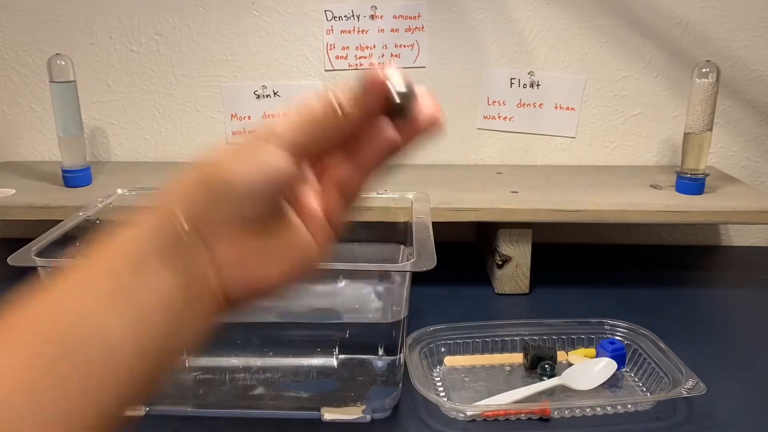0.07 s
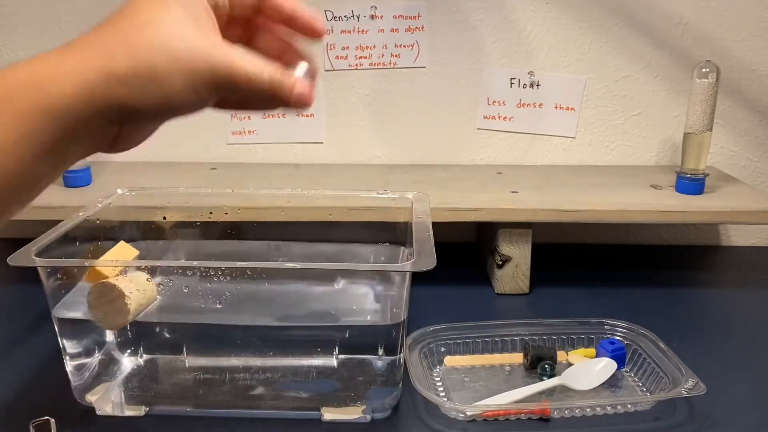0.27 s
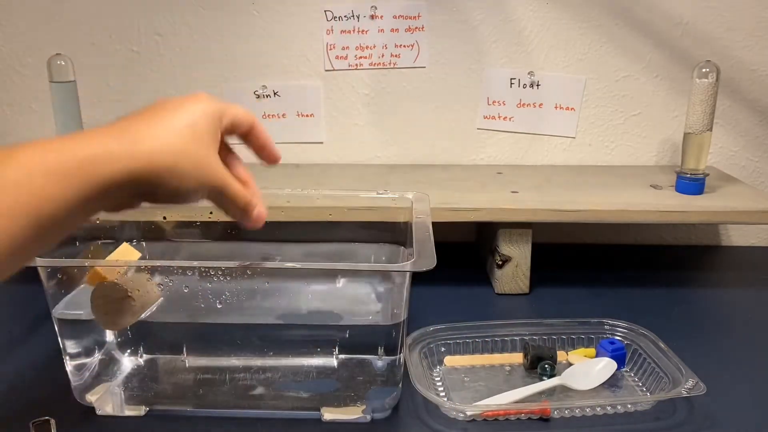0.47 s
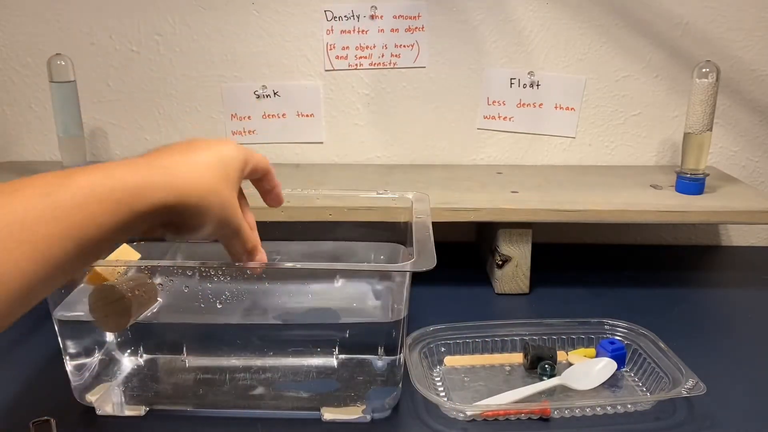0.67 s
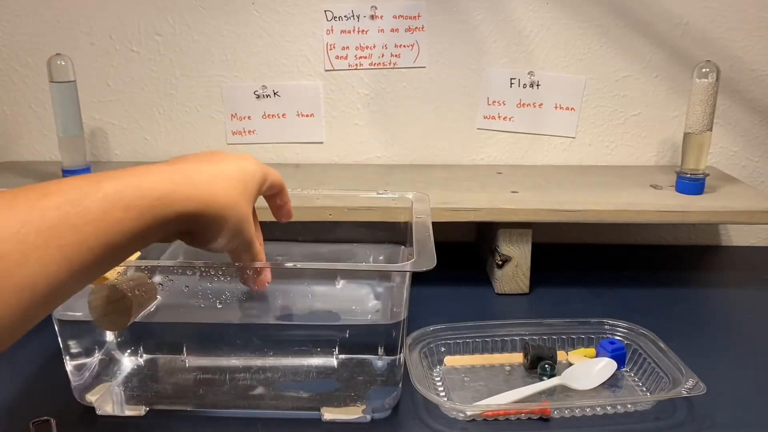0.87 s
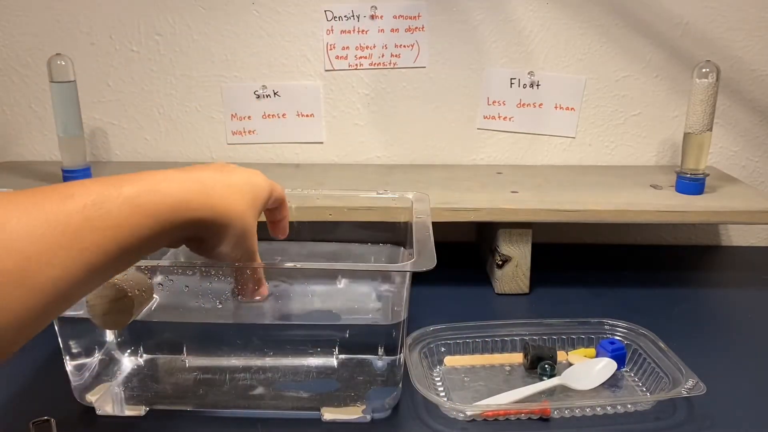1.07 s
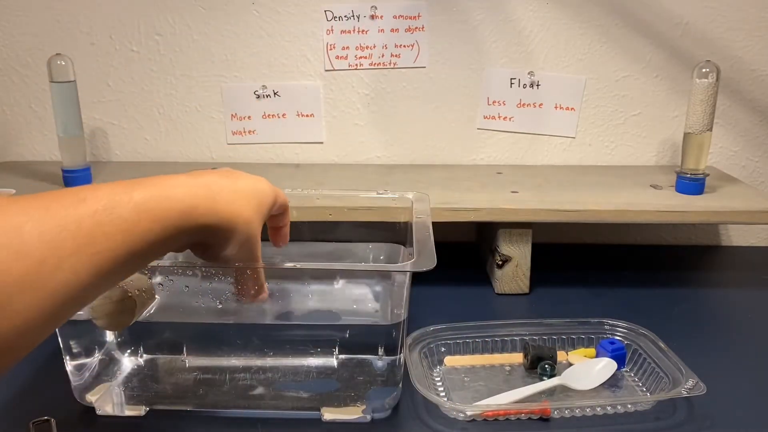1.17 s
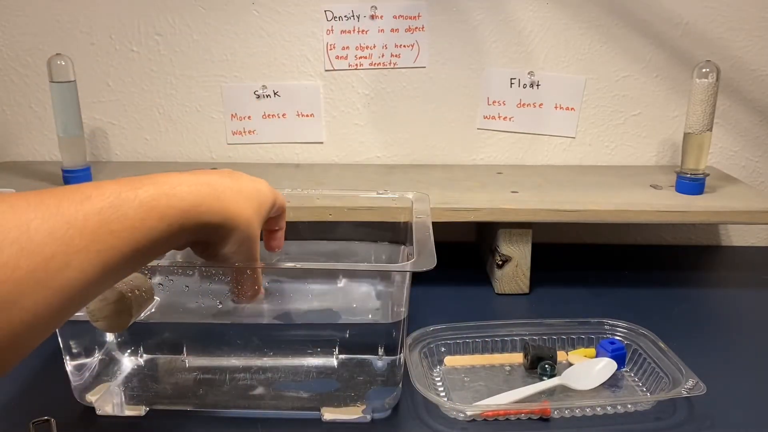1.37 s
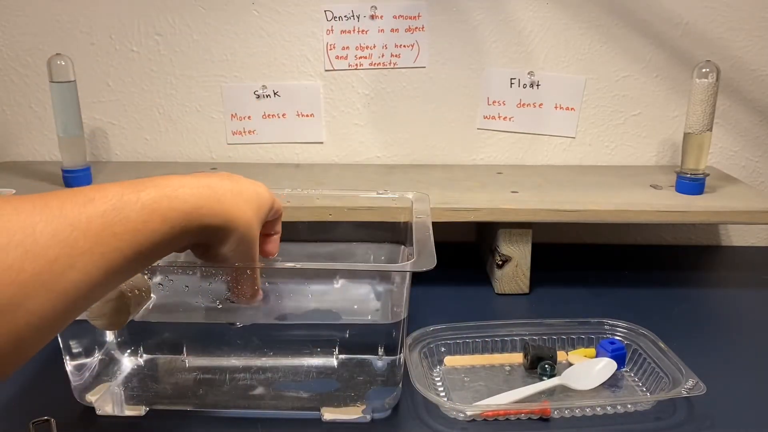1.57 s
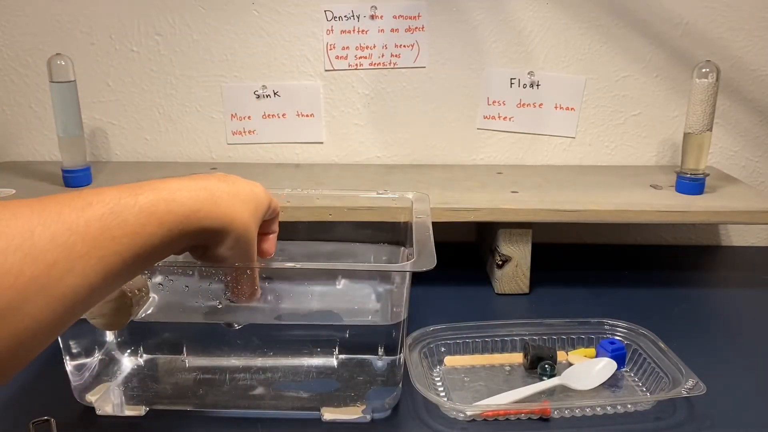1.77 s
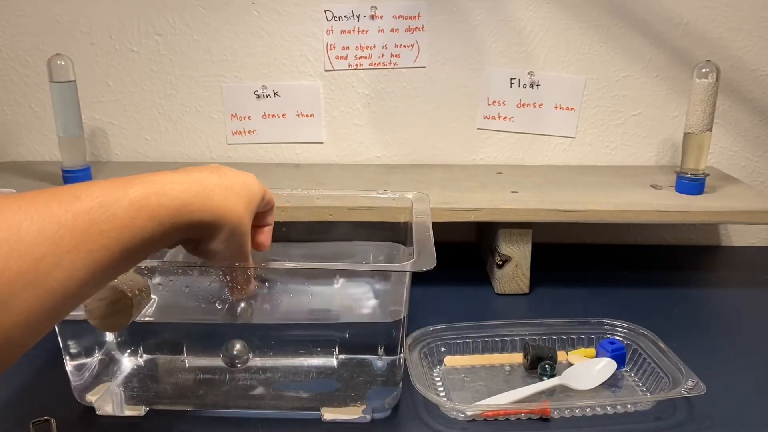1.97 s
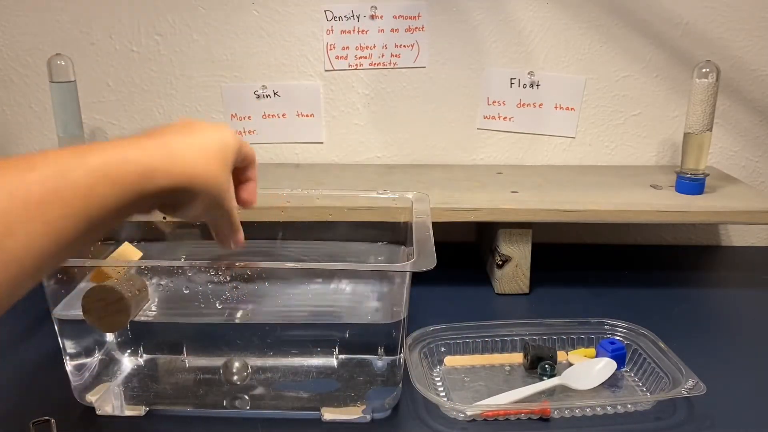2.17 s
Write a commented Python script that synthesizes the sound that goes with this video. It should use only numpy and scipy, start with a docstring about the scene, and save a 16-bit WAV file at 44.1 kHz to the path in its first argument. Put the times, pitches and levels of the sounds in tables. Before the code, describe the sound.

Hard hollow knocks of a metal ball bouncing in a water-filled plastic tub, after quiet room hum.

```python
"""On a table in a small room, a steel ball let go under water bounces four times on the floor of a plastic tub.
Each bounce is sooner and weaker, and the sound ends just after the fourth lands. Each blow is a dispersed
bending wave (treble first, bass later), damped modes of tub and table, a thud, and decaying bands of noise.
Shaped ventilation noise and a wavering sine as appliance hum run throughout; four tiny noise-burst ticks
come before the ball. Two close microphone ports hear it all."""
import sys
import numpy as np
from scipy import signal
from scipy.fft import rfft, irfft
from scipy.io import wavfile
from scipy.ndimage import uniform_filter1d

SR = 44100
rng = np.random.default_rng(int(sys.argv[2]) if len(sys.argv) > 2 else 0)


def generate_wav(sig):
    """Save sig (samples, or channels by samples) to the path in sys.argv[1] as 16-bit PCM at SR."""
    pcm = np.round(np.clip(np.atleast_2d(sig).T, -1, 1) * 32767).astype(np.int16)
    wavfile.write(sys.argv[1], SR, pcm)


N = 97416


def undb(db):
    """Decibel law: level to amplitude gain."""
    return 10 ** (np.asarray(db) / 20)


def unit(x):
    """Root-mean-square normalization to 1."""
    return x / np.sqrt(np.mean(x ** 2))


def read(table, hz):
    """Linear interpolation of a table's columns over log frequency."""
    rows = np.array(table).T
    log_hz = np.log(np.maximum(hz, 1))
    return [np.interp(log_hz, np.log(rows[0]), column) for column in rows[1:]]


def sides(pan_db):
    """Level difference, left minus right, split evenly into a column of two gains."""
    return undb(np.array([[pan_db], [-pan_db]]) / 2)


def pair(hz, width, like, size):
    """Partial coherence: two ports share a mid noise and oppose a side noise; width is in log frequency."""
    f = np.fft.rfftfreq(size, 1 / SR)
    shape = np.exp(-.5 * (np.log(np.maximum(f, 1) / hz) / width) ** 2)
    mid, side = (unit(irfft(rfft(rng.standard_normal(size)) * shape, size)) for _ in range(2))
    like = np.clip(like, -1, 1)
    opposed = side * np.array([[1], [-1]])
    return (np.sqrt(1 + like) * mid + np.sqrt(1 - like) * opposed) / np.sqrt(2)


def walk(rate):
    """Slow random modulation of rms 1: random steps, rate per second, smoothed twice."""
    k = int(SR / rate)
    steps = np.repeat(rng.standard_normal(N // k + 1), k)
    smooth = uniform_filter1d(uniform_filter1d(steps, k), k)
    return unit(smooth[:N])


def ring(t, t60, swell):
    """Exponential decay, 60 dB in t60, after a smooth build-up."""
    return (1 - np.exp(-(t / swell) ** 2)) * np.exp(-np.log(1000) * t / t60)


# spectrum of the room air: f/Hz, relative density level/dB per Hz
AIR_SPECTRUM = [(15, -46), (25, -12), (124, -6), (167, -14), (349, -14), (470, -18.5), (600, -16),
                (1060, -29), (7510, -59), (8830, -57), (11300, -70), (16500, -105)]
# coherence of the air noise at the two ports: f/Hz, correlation (-1 to 1)
AIR_COHERENCE = [(60, 1), (130, 0.73), (290, 0.49), (640, 0.035), (1400, -0.4), (3100, 0.37), (15000, 0.25)]
AIR_DB, AIR_PAN_DB = -57.5, 3.5  # rms level before panning; left minus right
AIR_SWELL_DB, AIR_FLICKER_DB = .5, 1  # rms drift of all bands together, and of each alone
DUCT_HZ, DUCT_WIDTH_HZ, DUCT_DB = 568, 69, -67


def air():
    """Broadband flow noise: third-octave bands swell together and flicker alone, beside one duct resonance."""
    bands, swell = 0, walk(6.15)
    for hz in 25 * 2 ** np.arange(0, 9.4, 1 / 3):
        # a band's power grows with its bandwidth, hence with its frequency
        db = read(AIR_SPECTRUM, hz)[0] + 10 * np.log10(hz)
        db = db + AIR_SWELL_DB * swell + AIR_FLICKER_DB * walk(6.52)
        bands = bands + undb(db) * pair(hz, .12, read(AIR_COHERENCE, hz)[0], N)
    duct = pair(DUCT_HZ, DUCT_WIDTH_HZ / DUCT_HZ / 2, 0., N)
    return (undb(AIR_DB) * unit(bands) + undb(DUCT_DB) * duct) * sides(AIR_PAN_DB)


HUM_HZ, HUM_DB = 118.1, -59.5  # center values
HUM_DRIFT, HUM_WAVER_DB = 0.011, 1.8  # rms drift of pitch (as a fraction) and of level


def hum():
    """Frequency and amplitude modulation: a low sine wavers slowly in pitch and level."""
    hz = HUM_HZ * (1 + HUM_DRIFT * walk(16.3))
    phase = 2 * np.pi * np.cumsum(hz) / SR
    return np.sqrt(2) * undb(HUM_DB + HUM_WAVER_DB * walk(9.4)) * np.sin(phase)


# tiny ticks: t/s, noise level/dB before the envelope, f/Hz, width in log frequency, t60/s,
# left minus right level/dB
TICK_BURSTS = [(.467, -76, 12500, 0.25, .06, 0), (.583, -78, 4230, .03, .03, 10),
               (0.935, -73, 7500, 0.31, 0.034, -2), (.952, -80, 6330, .15, .08, 1)]


def ticks():
    """Band-limited impulsive noise: each tick is a short burst under a decaying envelope."""
    size = SR // 20
    t, out = np.arange(size) / SR, np.zeros((2, N))
    for s, db, hz, width, t60, pan_db in TICK_BURSTS:
        start = int(s * SR)
        burst = ring(t, t60, .0005) * pair(hz, width, 0.44, size)
        out[:, start:start + size] += undb(db) * burst * sides(pan_db)
    return out


# first wave through the tub floor: f/Hz, relative level/dB, left minus right level/dB
FLOOR_WAVE = [(202, -17, 0), (454, 4, 3), (990, 5.5, -12), (1200, 24, -26), (1470, 19, -4), (1800, 7, -13),
              (2750, 16, 6), (4130, 6, 2), (4600, -6.5, 17), (5460, 11.5, 0), (6960, -1, -6),
              (10200, -1.5, 2.5), (12200, -6, 8), (16000, -12, -14)]
# returns from the tub walls: delay t/s, level/dB re first wave, left minus right level/dB
WALL_ECHOES = [(.0004, -11, -3), (.00115, -6, 3), (.0019, -14, -2), (.003, -16, -3)]
WAVE_DB, WAVE_SPLIT_HZ = 15.5, 650
TRAVEL_S, TRAVEL_POWER = .0015, 1.3  # delay at 1 kHz, and its growth towards the bass
PORT_LAG_S = .00028  # the left port hears the tub later


def wave(size, crack_db, body_db):
    """Dispersion of bending waves: a click spreads out, each frequency arriving later the lower it is."""
    f = np.fft.rfftfreq(size, 1 / SR)
    delay = TRAVEL_S * (np.maximum(f, 100) / 1000) ** -TRAVEL_POWER
    db, pan_db = read(FLOOR_WAVE, f)
    # body and crack levels add below the split; the crack level counts twice above it
    low = 1 / (1 + (f / WAVE_SPLIT_HZ) ** 4)
    gain = undb(db + low * body_db + (2 - low) * crack_db + WAVE_DB)
    gain = gain * (f / 200) ** 2 / (1 + (f / 200) ** 2)  # bass roll-off
    # phase is the integral of group delay over frequency
    phase = 2 * np.pi * (np.cumsum(delay) * f[1] + np.array([[PORT_LAG_S], [0]]) * f)
    walls = 1
    for s, wall_db, wall_pan_db in WALL_ECHOES:
        walls = walls + undb(wall_db) * sides(wall_pan_db) * np.exp(-2j * np.pi * f * s)
    ports = undb(np.array([pan_db, -pan_db]) / 2)
    return -irfft(gain * ports * walls * np.exp(-1j * phase), size)


MODE_LATE_S, MODE_LATE_POWER = .00064, .4  # onset delay at 1 kHz, and its growth towards the bass


def mode(t, hz, t60, swell):
    """Damped normal mode: a decaying sine, starting later the lower its frequency."""
    since = np.maximum(t - MODE_LATE_S * (hz / 1000) ** -MODE_LATE_POWER, 0)
    return ring(since, t60, swell) * np.sin(2 * np.pi * hz * since)


# modes of tub and table: f/Hz, left relative level/dB, right relative level/dB, t60/s, swell t/s,
# left polarity, right polarity
TUB_MODES = [(145.4, -13.8, -13.5, 0.448, 0.0023, -1, -1), (195.4, -12.1, -9.2, 0.087, 0.0134, 1, 1),
             (263.8, -1.3, -1.7, 0.136, 0.0198, -1, -1), (270.7, -7.3, -23.6, 0.204, 0.02, -1, -1),
             (295.3, -26.1, -32.5, 0.665, 0.02, 1, 1), (323.8, -10.4, -40.9, 0.258, 0.0183, -1, -1),
             (391.5, -20.6, -42.4, 0.325, 0.0055, -1, -1), (415.3, 0.5, -36.0, 0.156, 0.0012, 1, 1),
             (415.3, -5.4, -13.8, 0.312, 0.001, -1, -1), (445.2, -19.2, -20.8, 0.361, 0.001, -1, -1),
             (475.1, 0.7, -5.3, 0.103, 0.001, -1, -1), (503.8, -10.0, -27.3, 0.352, 0.02, -1, 1),
             (518.9, -13.7, -18.9, 0.267, 0.02, 1, 1), (534.8, -4.9, -14.8, 0.201, 0.0142, 1, 1),
             (561.8, -7.7, -29.7, 0.174, 0.017, 1, -1), (588.4, -7.9, -34.5, 0.228, 0.02, 1, -1),
             (597.4, 2.3, -5.2, 0.078, 0.0013, -1, -1), (618.5, -9.4, -27.6, 0.279, 0.0148, -1, -1),
             (652.3, -18.6, -6.8, 0.174, 0.0197, 1, -1), (692.7, -13.0, -21.2, 0.23, 0.0012, 1, 1),
             (711.8, -22.3, -17.6, 0.421, 0.001, -1, 1), (735.5, -29.8, -10.5, 0.145, 0.0026, 1, -1),
             (774.1, -34.5, -57.4, 0.7, 0.02, -1, 1), (786.5, -6.2, -2.7, 0.071, 0.0015, -1, -1),
             (825.6, -26.6, -29.8, 0.45, 0.0112, -1, 1), (849.5, -14.0, -12.2, 0.117, 0.001, -1, 1),
             (917.1, -23.3, -22.3, 0.283, 0.0034, -1, 1), (953.6, -15.2, -24.7, 0.148, 0.001, 1, -1),
             (1011.6, -36.8, -17.1, 0.202, 0.001, 1, -1), (1031.7, -14.1, -21.2, 0.112, 0.004, -1, 1),
             (1165, -26, -26, 0.19, 0.001, 1, 1), (1515, -23, -23, 0.12, 0.001, 1, 1),
             (1850, -27, -27, 0.08, 0.001, 1, 1), (2850, -32, -32, 0.1, 0.001, 1, 1),
             (3200, -30, -30, 0.1, 0.001, 1, 1)]
MODES_DB, MODE_SCATTER_DB = 4, 1  # added to all modes; random spread of each at each bounce


def tub_modes(heard, body_db):
    """Modal superposition: tub and table ring as a sum of damped modes, excited a little differently each time."""
    out = 0
    scatter = MODE_SCATTER_DB * rng.standard_normal(len(TUB_MODES))
    for (hz, left_db, right_db, t60, swell, left, right), own_db in zip(TUB_MODES, scatter):
        ports = undb([[left_db], [right_db]]) * [[left], [right]]
        out = out + undb(own_db + body_db + MODES_DB) * ports * mode(heard, hz, t60, swell)
    return out


# thud of the table: f/Hz, level/dB re the bounce's thud, t60/s, swell t/s, polarity
TABLE_THUD = [(67, -2.5, 0.065, 0.0026, -1), (109, -1, 0.076, 0.0025, 1)]


def table_thud(heard, thud_db):
    """Low-frequency modal response: two quickly damped table modes."""
    return sum(sign * undb(thud_db + db) * mode(heard, hz, t60, swell)
               for hz, db, t60, swell, sign in TABLE_THUD)


# dense ring and room tail: f/Hz, level/dB re body, t60/s, swell t/s, correlation of the ports,
# left minus right level/dB
DENSE_TAIL = [(105, -52, 0.49, 0.0029, 1, 7), (209, -20, 0.34, 0.0073, 1, 1),
              (423, -15, 0.2, 0.01, 0.47, -5), (800, -18, 0.41, 0.024, 0, -1.5),
              (1200, -22, 0.2, 0.002, 0.4, 1), (2420, -25.5, 0.15, 0.00067, 0.3, 3),
              (4780, -35, 0.23, 0.00092, 0.33, 2.5), (11000, -40.5, 0.17, 0.0005, 0, -1),
              (14200, -38.5, 0.062, 0.0006, 0, 1)]
TAIL_BANDS_HZ = 100 * 2 ** np.arange(0, 7.4, 1 / 3)
TAIL_NEW_HZ = 5000  # here half the tail's power is new as the ball lands on a new spot, less below
ROOM_DB, ROOM_T60_S = -13.5, 0.5  # room level re the dense ring


def dense_tail(t, body_db, same):
    """High modal density: overlapping modes act as noise, decaying at the rates of ring and room."""
    out = 0
    for hz, old in zip(TAIL_BANDS_HZ, same):
        db, t60, swell, like, pan_db = read(DENSE_TAIL, hz)
        new = hz / (hz + TAIL_NEW_HZ)
        noise = np.sqrt(1 - new) * old + np.sqrt(new) * pair(hz, 0.14, like, size=len(t))
        decay = ring(t, t60, swell) + undb(ROOM_DB) * ring(t, ROOM_T60_S, swell)
        out = out + undb(db + body_db) * decay * noise * sides(pan_db)
    return out


# bounces: t/s, crack relative level/dB, body relative level/dB, table thud relative level/dB
BALL_BOUNCES = [(1.8836, -7.5, -8, -12.5), (2.0343, -9.5, -10, -23), (2.1329, -13, -14, -35),
                (2.2, -17, -15, -37)]


def bounces():
    """Impact excitation: each blow sums first wave, modes, thud and a tail partly shared by all blows."""
    size = 2 ** 14
    t, out = np.arange(size) / SR, np.zeros((2, N + size))
    heard = np.maximum(t - np.array([[PORT_LAG_S], [0]]), 0)
    same = [pair(hz, 0.096, read(DENSE_TAIL, hz)[3], size) for hz in TAIL_BANDS_HZ]
    for s, crack_db, body_db, thud_db in BALL_BOUNCES:
        hit = wave(size, crack_db, body_db)
        hit = hit + tub_modes(heard, body_db)
        hit = hit + table_thud(heard, thud_db)
        hit = hit + dense_tail(t, body_db, same)
        start = int(s * SR)
        out[:, start:start + size] += hit
    return out[:, :N]


def scene():
    """Linear superposition of all sources."""
    return air() + hum() + ticks() + bounces()


CEILING = .95  # soft limit, full scale = 1
TOP_HZ = 16800


def record(dry):
    """Saturation and band limiting: the loudest peaks are rounded, then a steep low-pass cuts the top."""
    rounded = dry / (1 + (dry / CEILING) ** 4) ** (1 / 4)
    low_pass = signal.ellip(12, .2, 100, TOP_HZ, fs=SR, output="sos")
    return signal.sosfilt(low_pass, rounded)


dry = scene()
out = record(dry)
generate_wav(out)
```